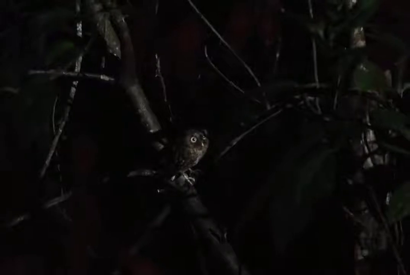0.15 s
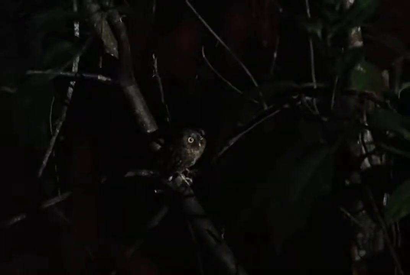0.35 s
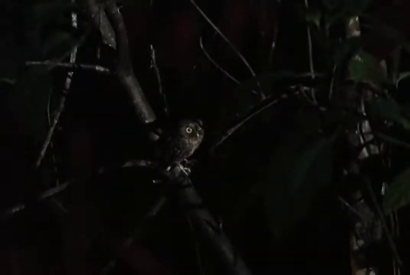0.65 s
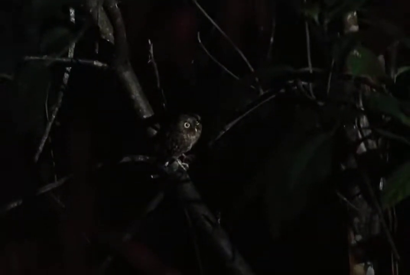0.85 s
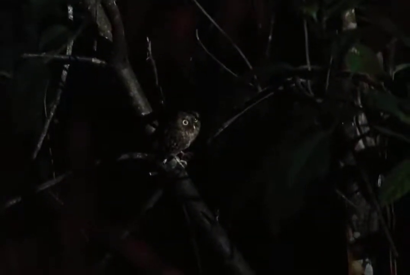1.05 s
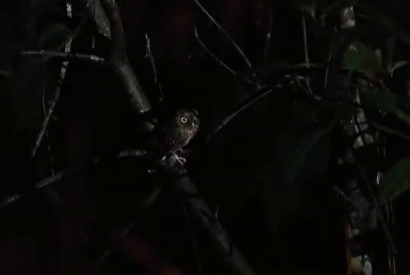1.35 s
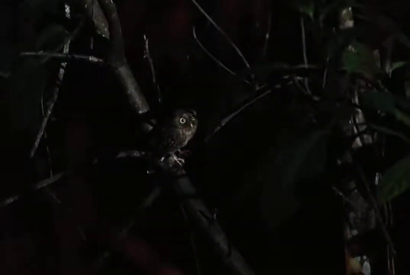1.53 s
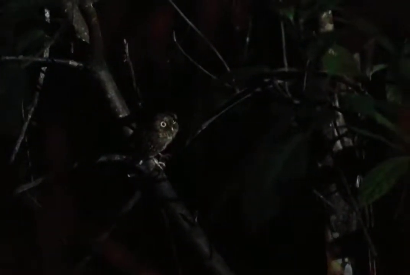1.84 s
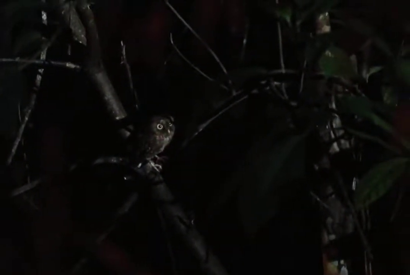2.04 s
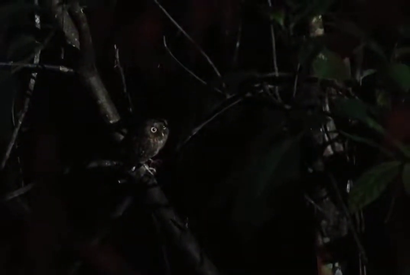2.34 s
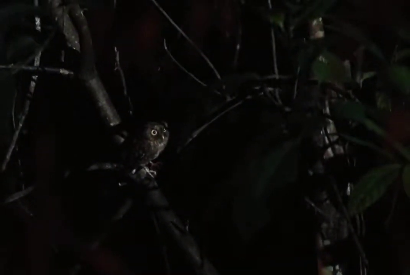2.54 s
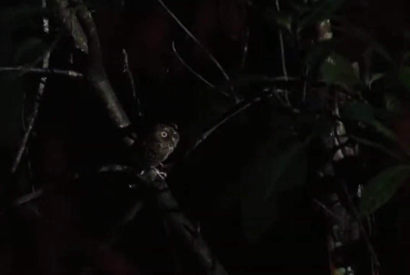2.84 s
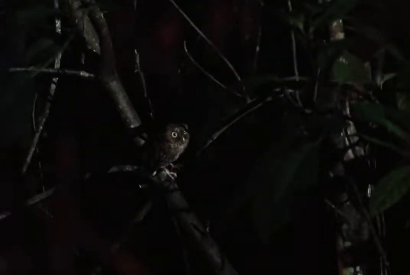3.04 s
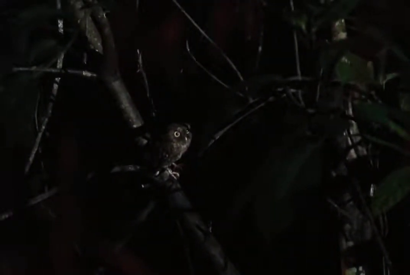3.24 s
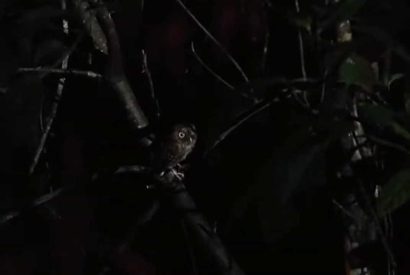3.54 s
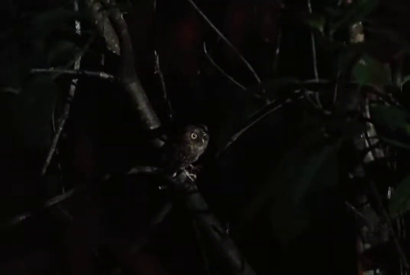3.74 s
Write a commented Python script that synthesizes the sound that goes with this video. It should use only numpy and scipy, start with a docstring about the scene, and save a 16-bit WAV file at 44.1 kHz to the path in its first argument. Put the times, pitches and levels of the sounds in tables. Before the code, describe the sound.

Two faint, even owl whistles stand out from steady hiss in a forest at night. Thin far peeps and a nearby drip on a leaf come first, and light handling ticks and knocks continue close to the microphone.

```python
"""A forest at night, on a hand-held camera. Steady hiss comes in, and thin peeps and one rising
whistle carry from far off among the trees. Fingers start to tick and knock on the camera, and
a drip smacks a leaf nearby. Then a small owl, right of the microphone, whistles two pure notes
a second apart, faintly answered by a far slope. More peeps follow as the handling goes on."""
import sys
import numpy as np
from scipy import signal
from scipy.io import wavfile
from scipy.ndimage import uniform_filter1d

SR = 44100
rng = np.random.default_rng(int(sys.argv[2]) if len(sys.argv) > 2 else 0)


def wav_out(sig):
    """Save sig, one row per channel (or a flat mono array), as 16-bit PCM at SR to the path in sys.argv[1]."""
    wavfile.write(sys.argv[1], SR, np.round(np.clip(np.atleast_2d(sig).T, -1, 1) * 32767).astype(np.int16))


N = 171108
TOP_HZ = 15850  # upper edge of the microphone's band


def amp(db):
    """Decibels to gain."""
    return 10 ** (np.asarray(db) / 20)


def unit(x):
    """Scales to rms 1."""
    return x / np.sqrt(np.mean(x ** 2) + 1e-20)


def read(points, hz):
    """Reads a table on a log-frequency axis."""
    table_hz, value = np.transpose(points)
    return np.interp(np.log(hz + 1), np.log(table_hz + 1), value)


def add(mix, start, sound):
    """Mixes a sound in at a start time in seconds."""
    part = mix[round(start * SR):][:len(sound)]
    part += sound[:len(part)]


def pan(x, db):
    """Places a sound by its left-minus-right level: negative is right of the microphone."""
    return np.array([x * amp(db / 2), x * amp(-db / 2)])


def low_cut(x, hz):
    """Small, light things radiate little bass."""
    return signal.sosfilt(signal.butter(2, hz, "highpass", fs=SR, output="sos"), x)


def ring(modes):
    """One tap leaves each mode ringing as a damped sine."""
    t = np.arange(SR // 10) / SR
    return sum(amp(db) * np.exp(-np.log(1000) * t / t60) * np.sin(2 * np.pi * hz * t)
               for hz, db, t60 in modes)


def whistle(hz, level, waver):
    """A pure tone with soft ends, its pitch unsteady by the fraction waver."""
    drift = unit(uniform_filter1d(rng.standard_normal(len(hz)), size=400))
    tone = np.sqrt(2) * np.sin(2 * np.pi * np.cumsum(hz * (1 + waver * drift)) / SR)
    return tone * level * signal.windows.tukey(len(hz), 0.1)


def forest(x, t60):
    """Scattered echoes from trunks and leaves, different on each side of the microphone."""
    t = np.arange(SR) / SR
    taps = rng.standard_normal((2, SR)) * (rng.random((2, SR)) < .05)
    tail = taps * np.exp(-np.log(1000) * t / t60) * (1 - np.exp(-t / 0.039))
    tail /= np.linalg.norm(tail, axis=1, keepdims=True)
    return signal.fftconvolve(x[None], tail, axes=1)[:, :N]


def leaf_scatter(x, share=0.18, flutter_s=0.0015):
    """Leaves scatter a far call: a share of its power flutters quickly at random."""
    pole = np.exp(-1 / (SR * flutter_s))
    noise = uniform_filter1d(rng.standard_normal(N), size=60)
    flutter = unit(signal.lfilter([1], [1, -pole], noise))
    return x * (np.sqrt(1 - share) + np.sqrt(share) * flutter)


def hiss(level_db=-45.5, patchy_db=0.74):
    """Microphone hiss and still night air: wide, even, faintly patchy."""
    # Each row: frequency in Hz, relative noise density in dB.
    spectrum = [(15, -48), (25, -19), (64, -17), (102, -5.5), (144, -8), (268, -4.5), (380, -2.5),
                (512, -2.5), (831, -2.5), (2140, -3), (6450, -4), (14500, -7), (15700, -9.5)]
    # Each row: frequency in Hz, correlation between left and right.
    correlation = [(60, 0.076), (600, .05), (1300, 0.073), (3000, 0.085), (12000, 0.033)]
    # Each row: frequency in Hz, left-minus-right level in dB.
    balance = [(100, -.5), (1100, -1.5), (3000, 0), (9000, 0)]
    hz = np.fft.rfftfreq(1024, 1 / SR)[:, None]
    noise = rng.standard_normal((N // 256 + 5, 513, 5)).T
    left, independent = noise[0] + 1j * noise[1], noise[2] + 1j * noise[3]
    likeness = read(correlation, hz)
    right = likeness * left + np.sqrt(1 - likeness ** 2) * independent
    patches = unit(uniform_filter1d(uniform_filter1d(noise[4], size=12, axis=0), size=14, axis=1))
    gain = amp(read(spectrum, hz) + patchy_db * patches) * (hz < TOP_HZ)
    frames = np.array([left, right]) * pan(gain, read(balance, hz))
    _, air = signal.istft(frames, nperseg=1024, noverlap=768)
    return amp(level_db) * unit(air[:, :N])


def far_calls(waver=0.0066):
    """Thin peeps and a rising whistle from small animals deep in the trees."""
    # Each row is a peep: start in seconds, length in seconds, pitch in Hz, glide in Hz/s, level in dB.
    peeps = [(.42, .105, 3200, 900, -56), (0.433, .055, 3490, 1200, -54.5), (.555, .07, 3270, 0, -61),
             (3.124, 0.082, 3258, 0, -51.5), (3.22, .06, 3250, -300, -57), (3.28, .07, 3200, -1300, -59.5)]
    # The whistle climbs, then dips as it fades. Each row: time in seconds, pitch in Hz, level in dB.
    rising_whistle = [(.86, 2460, -68), (.96, 2773, -62), (1.02, 3030, -60), (1.045, 3336, -55.5),
                      (1.08, 3590, -51.5), (1.105, 3630, -57), (1.14, 3300, -64)]
    voice = np.zeros(N)
    for start, length, hz, glide, db in peeps:
        t = np.arange(0, length, 1 / SR)
        swell = amp(db) * np.sqrt(np.sin(np.pi * t / length))
        add(voice, start, whistle(hz + glide * t, swell, waver))
    times, hz, db = np.transpose(rising_whistle)
    t = np.arange(times[0], times[-1], 1 / SR)
    add(voice, times[0], whistle(np.interp(t, times, hz), amp(np.interp(t, times, db)), waver))
    voice = leaf_scatter(voice)
    return pan(voice, db=-7.5) + amp(-6) * forest(voice, t60=1.1)


def handling(knock_rise_s=0.0025):
    """Each touch rings the camera shell, right at the microphone: dull knock, hollow body, sharp snap."""
    # Each row is a touch: start in seconds, then gains in dB for knock, body and snap.
    touches = [(.738, -45.5, -60, -65), (1.549, -66, -44, -52), (1.5706, -51, -56, -38),
               (1.734, -45.5, -46.5, -60), (1.903, -46.5, -54, -46), (2.5163, -45.5, -40.5, -36),
               (2.760, -45, -62, -62), (2.9423, -43, -42.5, -37.5), (3.080, -44, -50, -60),
               (3.2231, -45.5, -40.5, -39), (3.357, -47, -61, -60), (3.4775, -47, -42.5, -38.5),
               (3.594, -44.5, -64, -60), (3.6834, -46, -40.5, -41), (3.816, -44, -64, -58)]
    # The shell's modes. Each row: frequency in Hz, relative level in dB, seconds to fall 60 dB.
    knock_modes = [(282, -5, 0.053), (371.6, -2.5, 0.069)]
    body_modes = [(680, -9.5, .012), (1030, 1, .016), (1400, -12, .007)]
    snap_modes = [(2140, -10.5, .004), (3000, -2.5, 0.0075), (3770, -2.5, .004), (5350, -2.5, 0.004)]
    knock, body, snap = ring(knock_modes), ring(body_modes), ring(snap_modes)
    t = np.arange(len(knock)) / SR
    knock *= 1 - np.exp(-t / knock_rise_s)  # a soft finger pushes the shell gently
    shell = np.zeros(N)
    for start, knock_db, body_db, snap_db in touches:
        add(shell, start, amp(knock_db) * knock + amp(body_db) * body - amp(snap_db) * snap)
    return pan(low_cut(shell, hz=173), db=-8)


def drip(start_s=1.31, chirp_s=0.0025, start_hz=1790, rise_hz_per_s=680000):
    """A drop smacks a leaf near the microphone: a very short upward chirp and a brief ring."""
    # The leaf's modes. Each row: frequency in Hz, level in dB before the low cut, seconds to fall 60 dB.
    leaf_modes = [(1020, -36, 0.017), (1350, -35, 0.017), (3700, -39, .004), (5800, -34, .002)]
    smack, t = np.zeros(N), np.arange(0, chirp_s, 1 / SR)
    chirp = np.cos(2 * np.pi * (start_hz * t + rise_hz_per_s * t ** 2 / 2))
    envelope = amp(-30.5) * np.sin(np.pi * np.sqrt(t / chirp_s))
    add(smack, start_s, envelope * chirp)
    add(smack, start_s, ring(leaf_modes))
    return pan(low_cut(smack, hz=1000), db=-4.5)


def owl(scoop_hz=42, scoop_s=0.033, echo_delay_s=0.14):
    """Two whistles, each scooping up to a held pitch, with a faint echo off a far slope."""
    # The loudness curve of each note. Each row: time in seconds, level in dB.
    first_note = [(1.81, -68), (1.85, -54), (1.90, -50), (1.952, -45), (1.996, -47.5), (2.025, -56)]
    second_note = [(2.79, -63), (2.815, -51), (2.85, -45), (2.888, -52), (2.92, -49), (2.998, -47.5),
                   (3.025, -65)]
    voice, echo = np.zeros(N), np.zeros(N)
    for curve, held_hz, echo_db in ((first_note, 1640, -23), (second_note, 1650, -13.5)):
        times, db = np.transpose(curve)
        start = times[0]
        t = np.arange(start, times[-1], 1 / SR)
        pitch = held_hz - scoop_hz * np.exp(-(t - start) / scoop_s)
        note = whistle(pitch, amp(np.interp(t, times, db)), waver=0.0019)
        add(voice, start, note)
        add(echo, start + echo_delay_s, amp(echo_db) * note)
    return pan(voice + echo, db=-5) + amp(-15) * forest(voice, t60=0.9)


def scene():
    """The night forest as it reaches the microphone."""
    return owl() + far_calls() + handling() + drip() + hiss()


def record(dry):
    """The microphone switches on after a moment of silence; the top treble is cut steeply."""
    switch_on_s = 0.1575
    live = dry * (np.arange(N) / SR >= switch_on_s)
    lowpass = signal.firwin(511, TOP_HZ, window=("kaiser", 9), fs=SR)
    return signal.oaconvolve(live, lowpass[None], "same")


dry = scene()
out = record(dry)
wav_out(out)
```